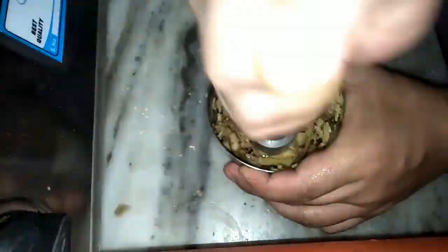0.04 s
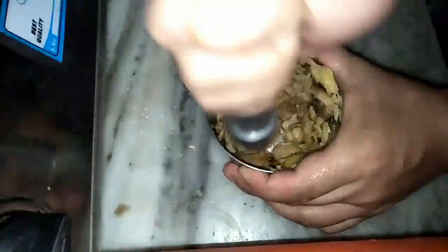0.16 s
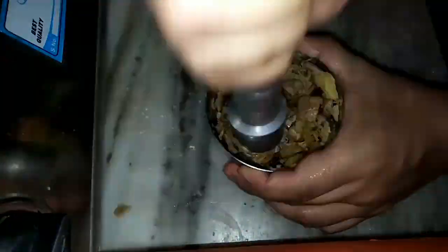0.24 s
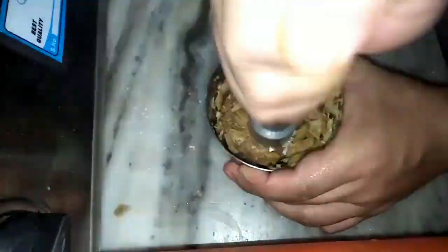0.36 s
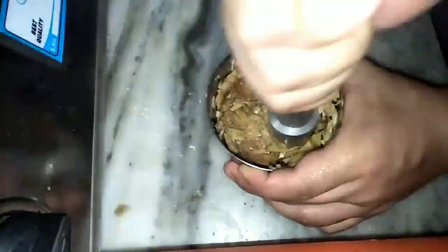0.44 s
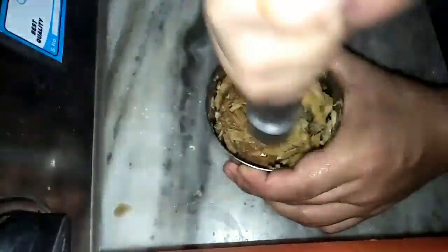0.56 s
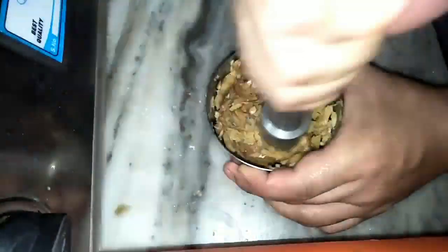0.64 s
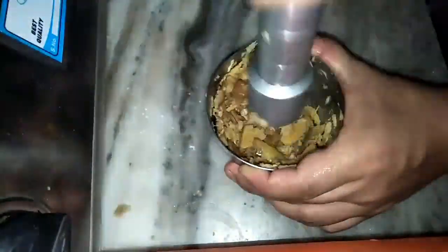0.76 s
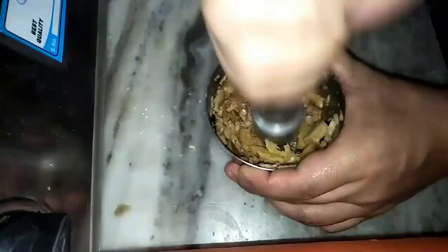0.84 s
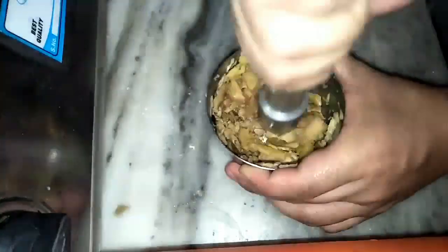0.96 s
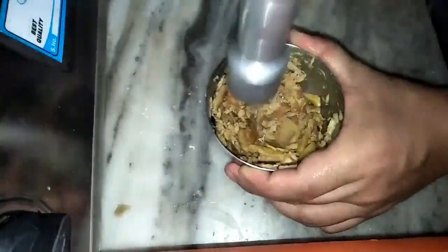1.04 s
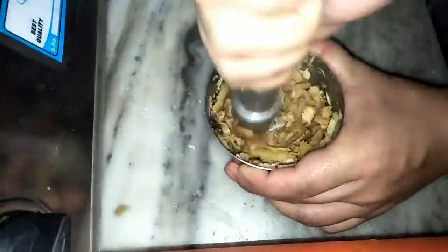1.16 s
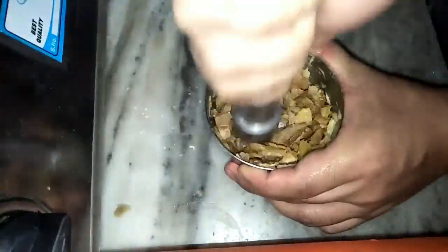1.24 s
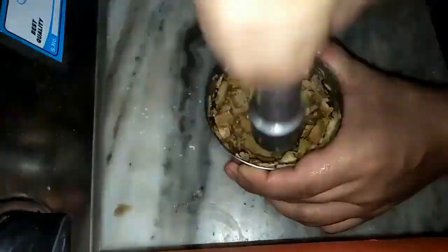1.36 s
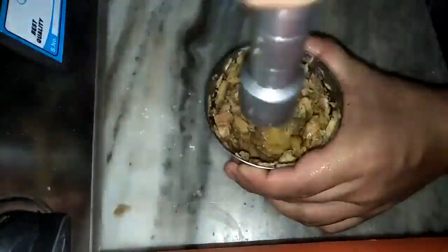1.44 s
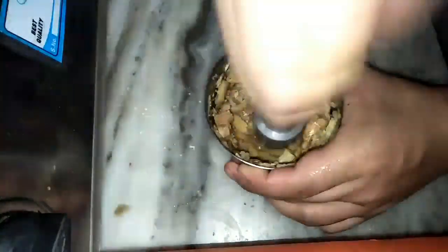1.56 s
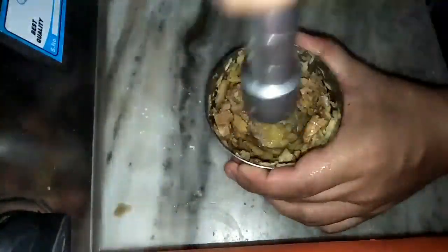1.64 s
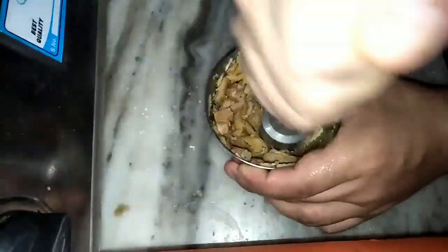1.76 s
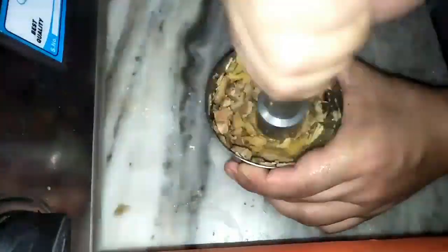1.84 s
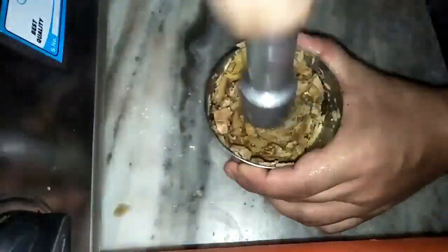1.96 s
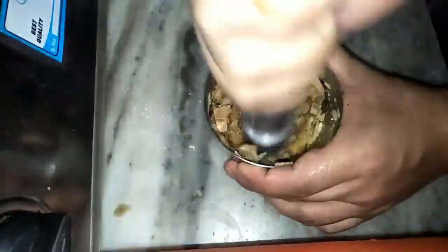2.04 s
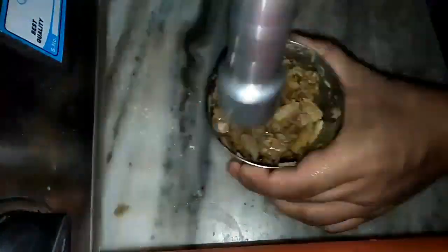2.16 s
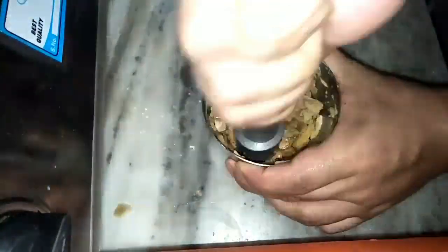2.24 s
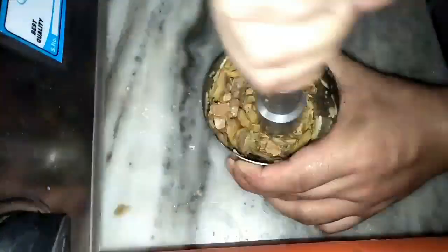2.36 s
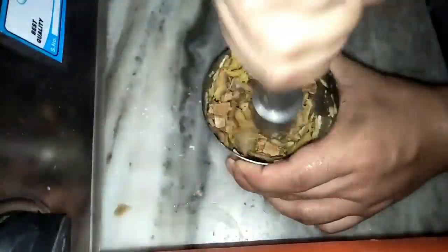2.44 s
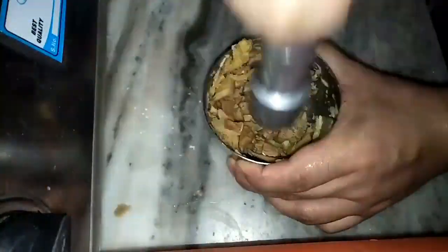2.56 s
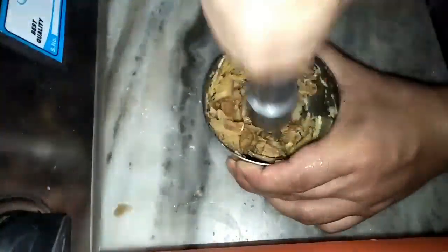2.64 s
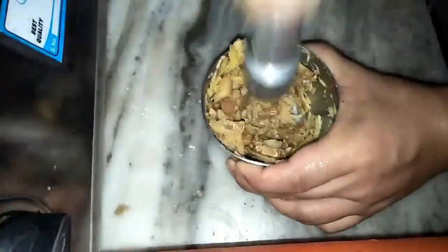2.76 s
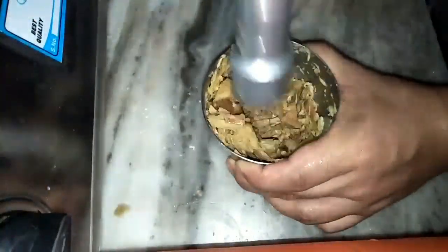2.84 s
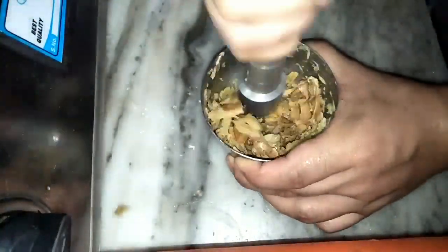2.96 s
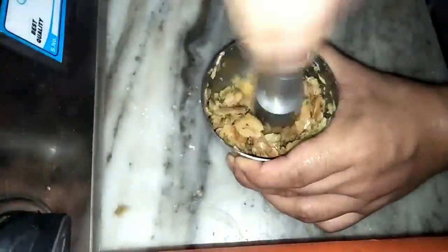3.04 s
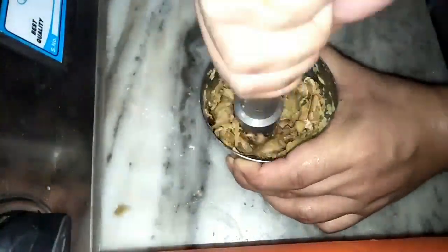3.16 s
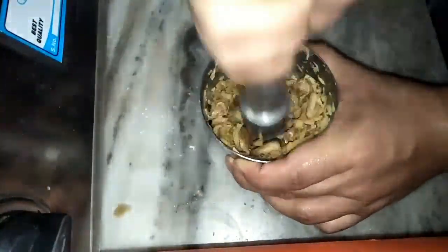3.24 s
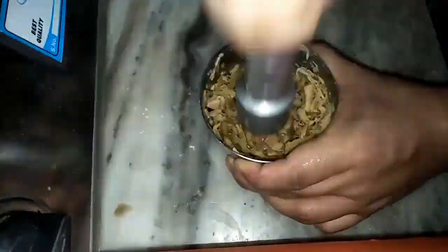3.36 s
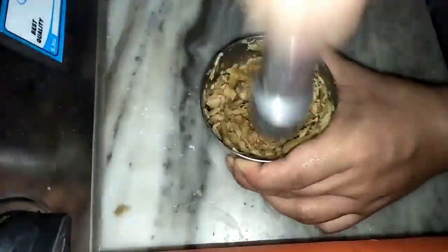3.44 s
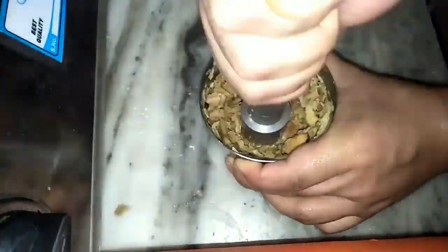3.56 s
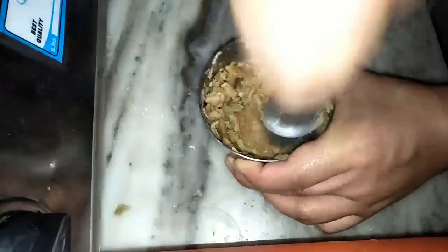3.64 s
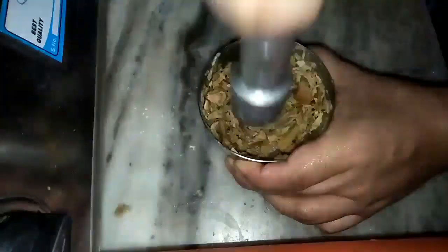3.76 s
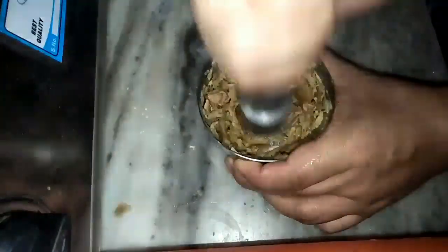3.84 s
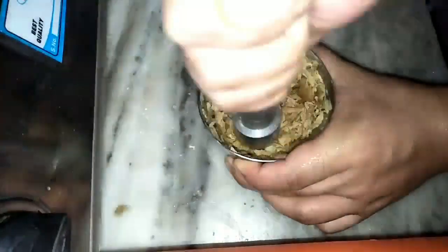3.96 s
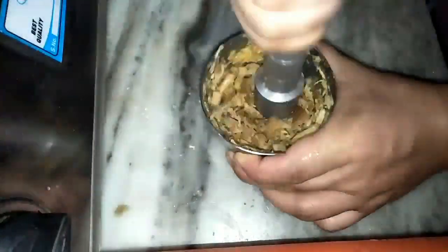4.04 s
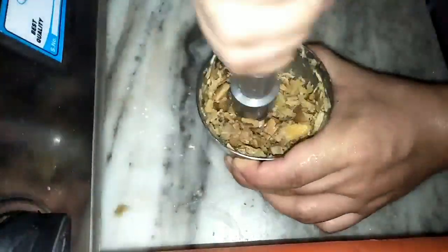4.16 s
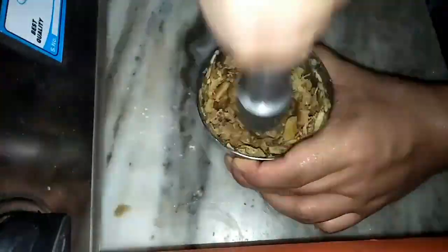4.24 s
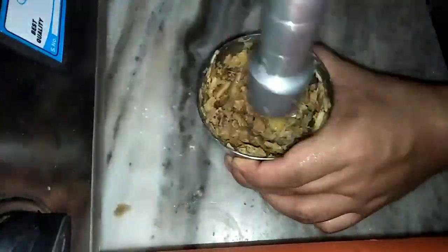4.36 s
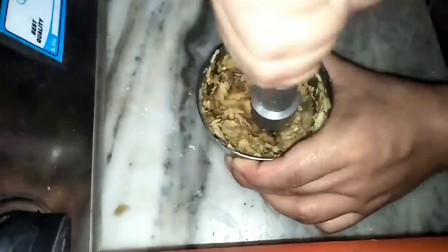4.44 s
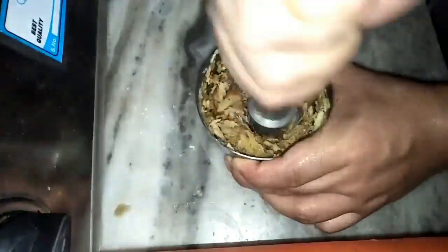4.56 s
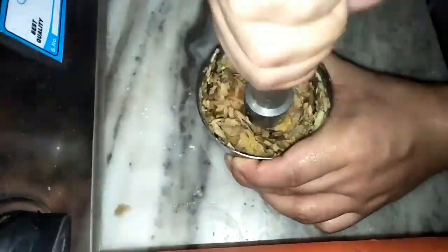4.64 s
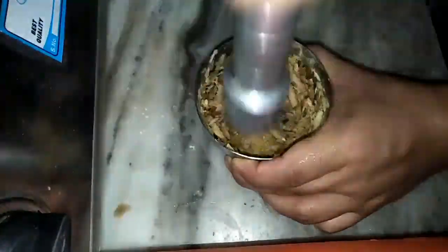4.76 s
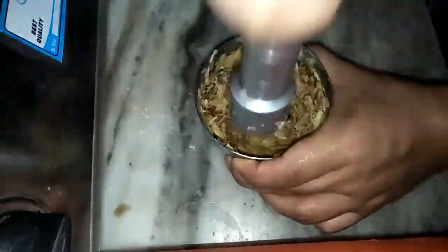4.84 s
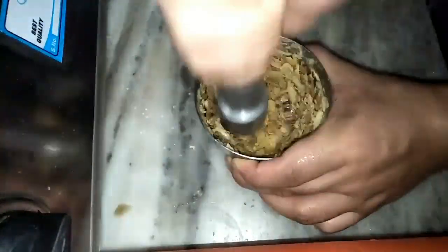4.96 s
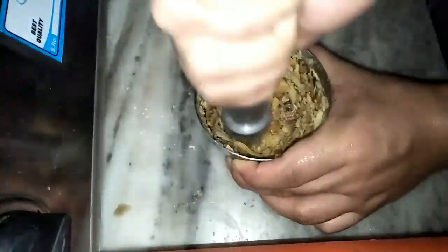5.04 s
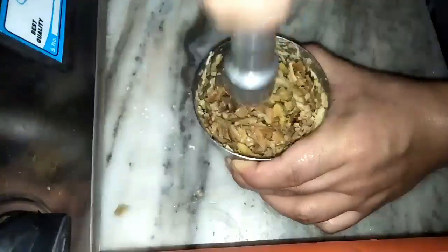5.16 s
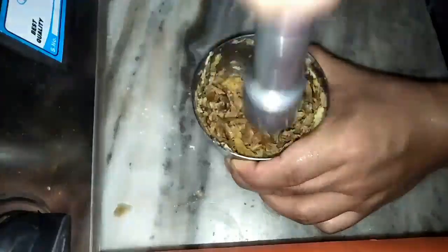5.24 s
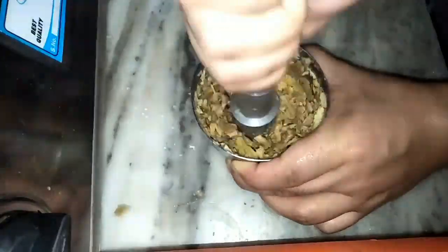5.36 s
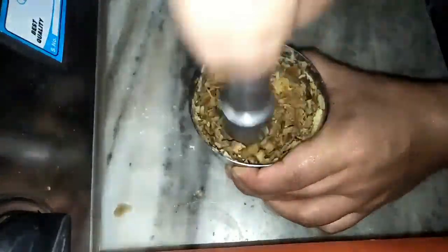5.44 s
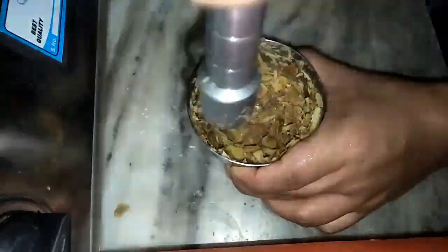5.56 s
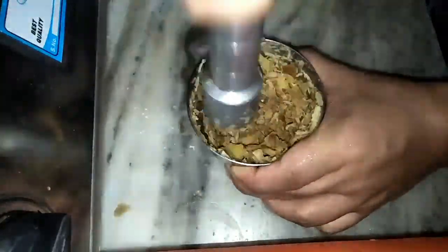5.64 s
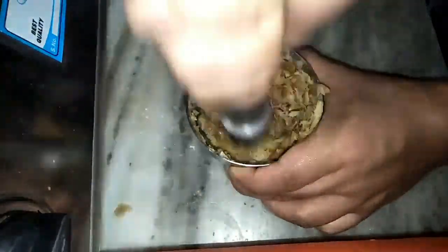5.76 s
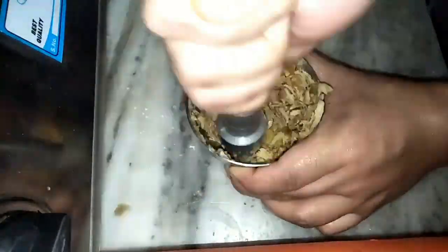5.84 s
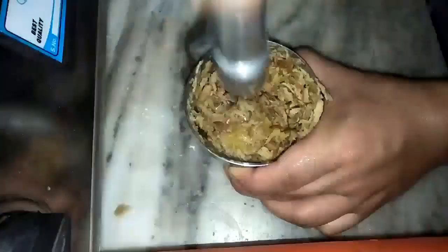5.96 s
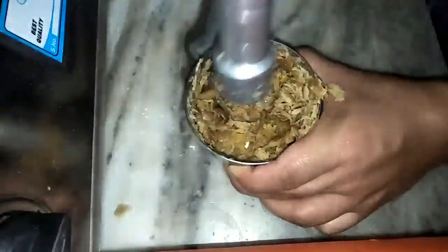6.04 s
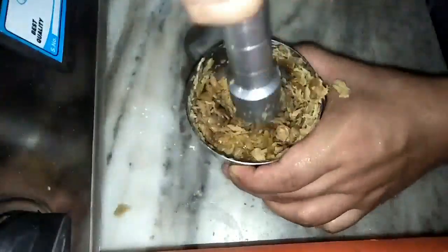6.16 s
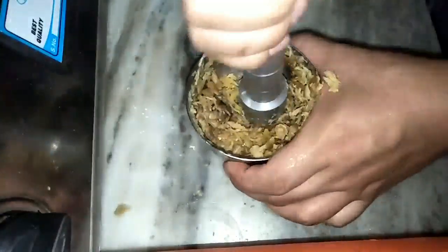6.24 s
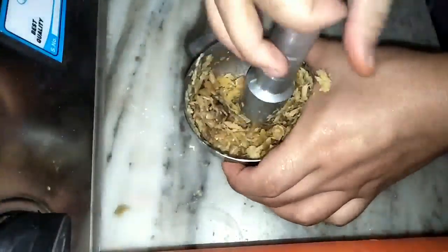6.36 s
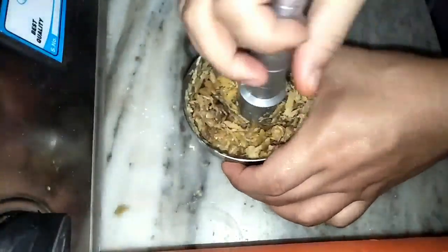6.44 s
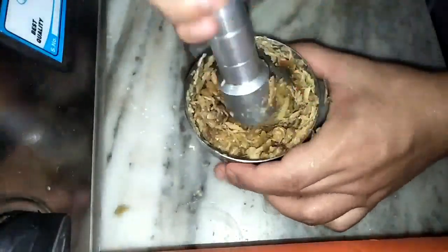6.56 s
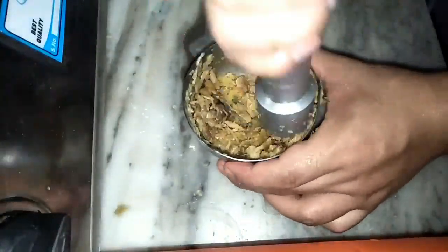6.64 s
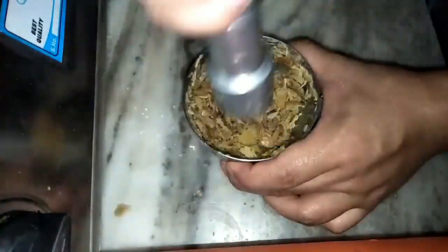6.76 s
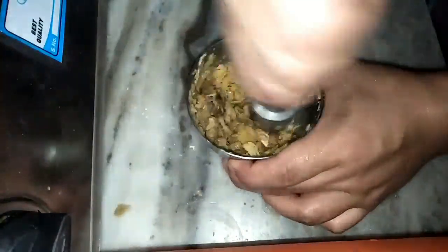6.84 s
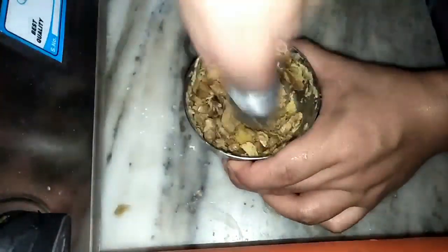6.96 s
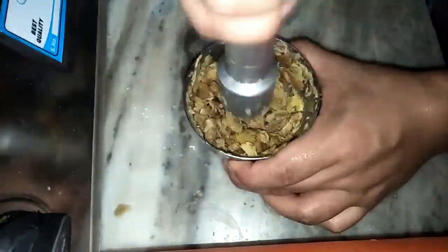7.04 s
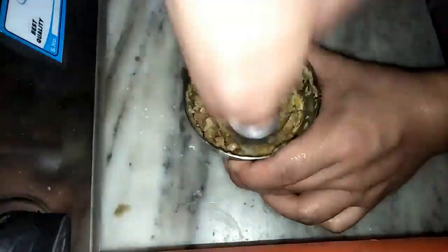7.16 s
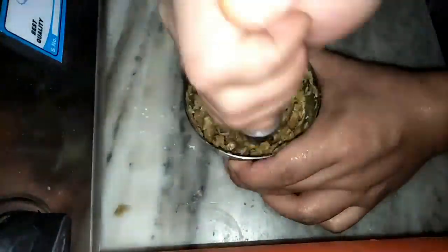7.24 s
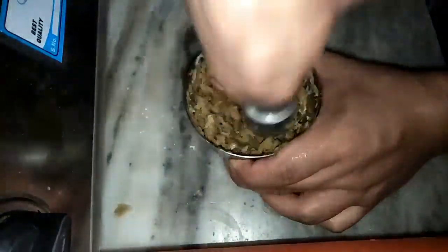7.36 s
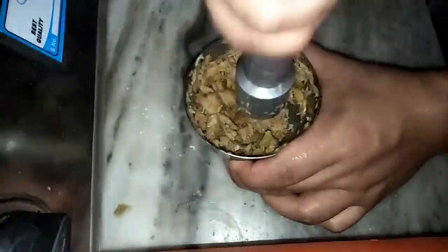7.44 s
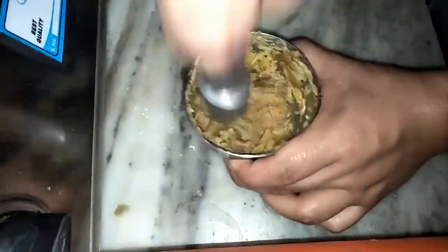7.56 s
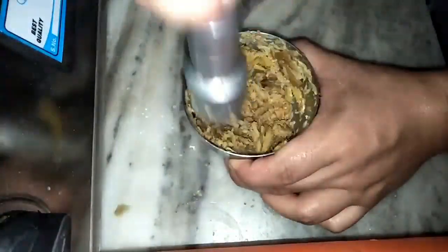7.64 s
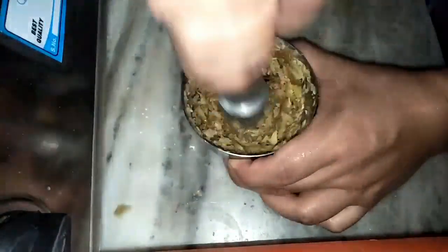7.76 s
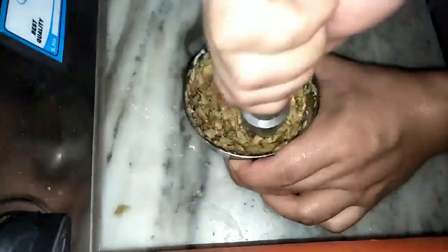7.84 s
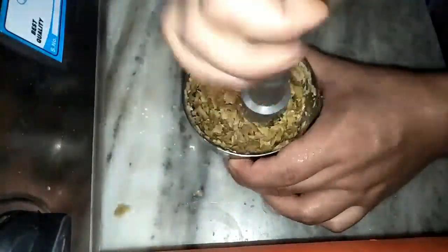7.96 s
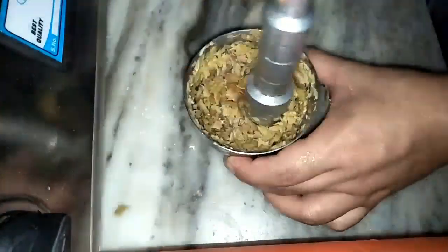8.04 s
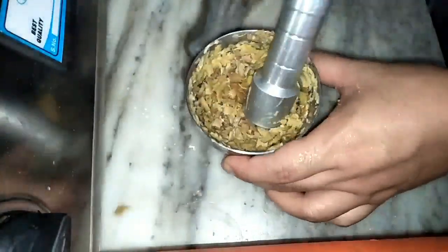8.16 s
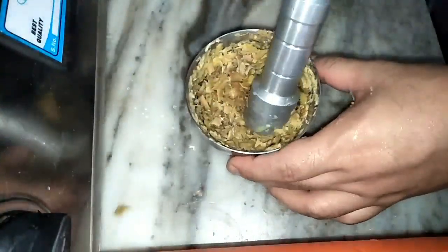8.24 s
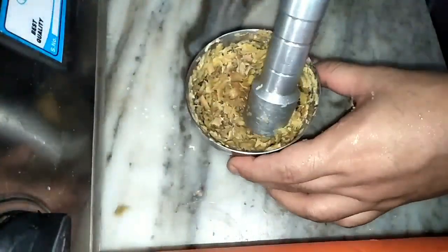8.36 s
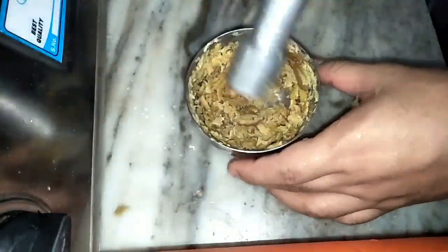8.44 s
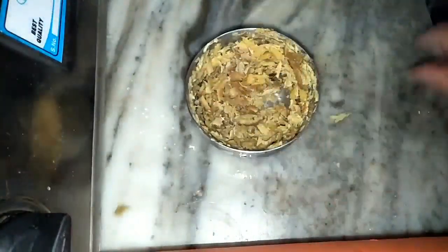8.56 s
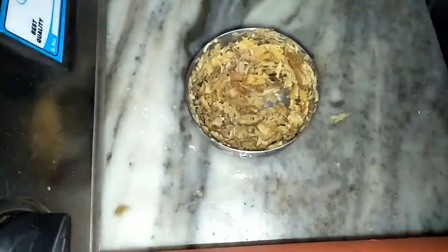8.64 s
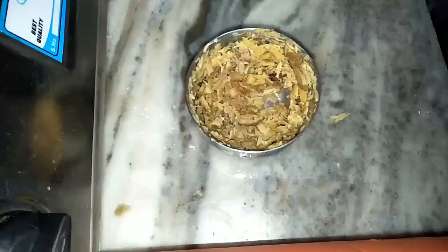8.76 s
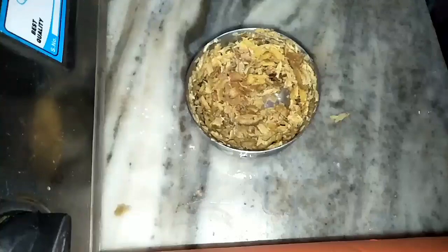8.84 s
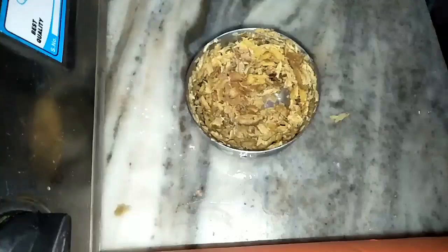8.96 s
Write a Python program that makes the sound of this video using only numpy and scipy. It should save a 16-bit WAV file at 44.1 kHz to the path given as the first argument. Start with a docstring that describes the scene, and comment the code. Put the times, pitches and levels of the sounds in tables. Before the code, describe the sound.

A metal pestle pounds ginger very fast in a small steel mortar on a stone counter. Each blow is a dull thud with a wet crunch, and now and then one hits bare steel with a short, bright clank. The pounding slackens briefly about two thirds through, resumes, then stops near the end. A faint low hum lies underneath, heard close in a small kitchen.

```python
"""Pounding ginger in a steel mortar

A metal pestle pounds ginger very fast in a small steel mortar, held by hand on a stone kitchen counter.
Each blow bursts wet fibres (a crunch) and shoves the mortar against the counter (a dull thud); on bare
steel, contact forces excite the bowl's damped modes (a clank). Walls and ceiling reflect the sound.
A low hum and soft room noise lie underneath; a few faint, far tones sound when the pounding rests."""
import sys
import numpy as np
from scipy import signal
from scipy.fft import rfft, irfft, next_fast_len
from scipy.io import wavfile
from scipy.ndimage import map_coordinates

SR = 44100
rng = np.random.default_rng(int(sys.argv[2]) if len(sys.argv) > 2 else 0)


def store_pcm(level_fs):
    """Save levels as 16-bit WAV."""
    pcm = np.round(np.clip(level_fs, -1, 1) * 32767).astype(np.int16)
    wavfile.write(sys.argv[1], SR, np.atleast_2d(pcm).T)


N = 396895
TIME = np.arange(N) / SR
BLOW_SIZE, LEAD_S = 8192, .04
BLOW_T = np.arange(BLOW_SIZE) / SR - LEAD_S  # seconds from a blow's peak of pressure

# modes of the steel bowl, damped by hand and ginger: (frequency [Hz], relative level [dB])
BOWL_MODES = [(1020, -2.5), (1160, 1.5), (1245, 5), (1490, 4.5), (1780, -3.5), (2025, -7.5), (2430, 1),
              (2640, -3.5), (2790, 0.5), (2935, 2.5), (3120, -12.5), (3500, -5.5), (4050, 7.5),
              (5400, -7.5)]


def from_db(db):
    """Decibels to amplitude ratio."""
    return 10 ** (np.asarray(db) / 20)


def coloured(x, points):
    """Zero-phase filtering by a spectral envelope of (frequency [Hz], gain [dB]) points."""
    hz, db = np.transpose(points)
    size = next_fast_len(len(x))
    bins = np.maximum(np.fft.rfftfreq(size, 1 / SR), 1)
    gain = from_db(np.interp(np.log(bins), np.log(hz), db))
    return irfft(rfft(x, size) * gain, size)[:len(x)]


def at_level(x, db, band, seconds=.04):
    """Parseval's theorem: scale x so that its energy in a band, spread over `seconds`, has this level."""
    hz = np.fft.rfftfreq(len(x), 1 / SR)
    energy = 2 * np.sum(np.abs(rfft(x)[(hz > band[0]) & (hz < band[1])]) ** 2) / len(x)
    return x * from_db(db) / np.sqrt(energy / (seconds * SR) + 1e-20)


def ring(x, hz, t60):
    """Damped harmonic oscillator: its impulse response is a decaying cosine of initial height 1."""
    r, w = from_db(-60 / (t60 * SR)), 2 * np.pi * hz / SR
    return signal.lfilter([1, -r * np.cos(w)], [1, -2 * r * np.cos(w), r * r], x + 1e-18)


def drift(per_s):
    """Smooth random modulation: a spline through Gaussian values of unit spread."""
    return map_coordinates(rng.standard_normal(2000), [TIME * per_s], order=3, mode="wrap")


def grains(per_s, spread_db):
    """Shot noise: a Poisson train of impulses of random size and sign."""
    sizes = from_db(spread_db * np.minimum(rng.exponential(1, BLOW_SIZE), 4))
    signs = rng.choice([-1, 1], BLOW_SIZE)
    return sizes * signs * (rng.random(BLOW_SIZE) < per_s / SR)


def push(when, width):
    """Acceleration pulse under a force that builds slowly and lets go fast."""
    u = np.minimum((BLOW_T - when) / width + 1.4, 5)
    return np.exp(u - np.exp(u)) * (np.exp(u) - (1 - np.exp(u)) ** 2)


def thud(delay_s, thud_db, knock_db, ring_share=0.0094, scatter_db=3, detune=0.031):
    """Impact excitation: the pestle bites into the heap, then bottoms out; both ring the counter."""
    # modes of the mortar on the counter: (frequency [Hz], relative level [dB], T60 [s])
    counter_modes = [(94.2, 3, 0.066), (179.3, -8, 0.11), (300.7, 0.5, 0.07), (371, 4.5, 0.04),
                     (422, -7, 0.043)]
    softness_db = np.clip(thud_db - knock_db - 10, -8, 12)
    width = .0023 * from_db(.25 * softness_db)  # a softer contact lasts longer
    bite = rng.uniform(.15, .5) * push(delay_s - rng.uniform(2.4, 3.8) * width, .8 * width)
    shoves = bite + push(delay_s, width)
    body = shoves.copy()
    for hz, db, t60 in counter_modes:
        gain = ring_share * from_db(db + scatter_db * rng.normal())
        body += gain * ring(shoves, hz * (1 + detune * rng.normal()), t60)
    low = signal.sosfiltfilt(signal.butter(3, 220, fs=SR, output="sos"), body)
    return at_level(low, thud_db, (35, 220)) + at_level(body - low, knock_db, (220, 480))


def contact_pressure(build_s, fade_s):
    """Loading and relaxation: pressure sets in as the pestle lands, swells, then decays exponentially."""
    before = np.maximum(-BLOW_T, 0) / build_s
    rising = np.exp(-0.85 * before ** 2 - (before / 1.15) ** 12)
    return np.where(BLOW_T < 0, rising, np.exp(-np.abs(BLOW_T) / fade_s))


def crunch(pressure, squelch_db, crunch_db, pocket_share=0.022, loose_db=-23, loose_s=0.008):
    """Acoustic emission: fibres burst under pressure and ring small wet pockets, new at every blow."""
    # spectrum of crushed fibres: (frequency [Hz], relative density [dB])
    fibre_spectrum = [(300, -1.5), (700, -14.5), (950, -26.5), (1240, -4.5), (1750, -9), (2300, -1),
                      (2850, 5.5), (3400, 1), (5000, -1), (6500, -12), (8000, -17), (10200, -18),
                      (12000, -51.5)]
    # spectrum of wet pulp squeezed aside: (frequency [Hz], relative density [dB])
    pulp_spectrum = [(250, -14), (480, 2), (680, 7), (800, 3), (950, 1), (1300, -18), (2500, -53)]
    loose_rustle = from_db(loose_db) * np.exp(-(BLOW_T / loose_s) ** 2)
    bursts = grains(per_s=9000, spread_db=3.5) * (pressure + loose_rustle)
    pocket_hz = np.exp(rng.uniform(np.log(1000), np.log(9000), size=8))
    pockets = sum(ring(bursts, hz, t60=.024) for hz in pocket_hz)
    fibres = coloured(bursts + pocket_share * pockets, fibre_spectrum)
    pulp = coloured(bursts, pulp_spectrum)
    return at_level(fibres, crunch_db, (3600, 10000)) + at_level(pulp, squelch_db, (520, 980))


def clank(pressure, clank_db, clank_hz, clink_db, clink_hz, spot_db, focus_db_per_octave):
    """Modal superposition: skid, strike and rattle ring the bowl and two resonances of the struck spot."""
    rattle = from_db(-21) * (BLOW_T > 0) * np.exp(-np.abs(BLOW_T) / 0.0072)
    contacts = grains(per_s=7000, spread_db=3) * (pressure + rattle)
    contacts[round(LEAD_S * SR)] += 0.18  # the strike itself
    low, high = np.zeros((2, BLOW_SIZE))
    for hz, db in [*BOWL_MODES, (clank_hz, spot_db), (clink_hz, spot_db)]:
        detuning = 1 + .008 * rng.normal()
        # modes near the spot's own resonances respond most
        octaves_off = np.abs(np.log2(hz / np.array([clank_hz, clink_hz]))).min()
        gain = from_db(db - focus_db_per_octave * octaves_off + 2 * rng.normal())
        mode = gain * ring(contacts, hz * detuning, t60=.028)
        if hz < 1900:
            low += mode
        else:
            high += mode
    # the small bowl radiates little below its lowest mode, and pulp takes the edge off the contact
    low = signal.sosfilt(signal.butter(3, [980, 1950], "band", fs=SR, output="sos"), low)
    high = signal.sosfilt(signal.butter(3, [1550, 3400], "band", fs=SR, output="sos"), high)
    return at_level(low, clank_db, (1000, 1600)) + at_level(high, clink_db, (2300, 3300))


def favoured_mode(low_hz, high_hz):
    """The strike point selects a mode: draw one in this range, with odds proportional to its power."""
    hz, db = np.transpose([mode for mode in BOWL_MODES if low_hz < mode[0] < high_hz])
    power = np.cumsum(from_db(db) ** 2)
    return hz[np.searchsorted(power, rng.random() * power[-1])]


def ginger_blow(time_s, build_s, thud_db, knock_db, crunch_db, bowl_db):
    """Cushioned impact: the deeper into the ginger, the more squelch and clink. Gives (soft, steel)."""
    force, crisp, depth = knock_db + 30, crunch_db + 44, bowl_db + 46  # dB relative to a full blow
    fade_s = 0.0065 * 2 ** (-max(crisp, -10) / 17.5)  # a crisp crush is over sooner
    pressure = contact_pressure(max(build_s, .0008), fade_s)
    flattening_db = 0.9 * time_s  # flattened ginger squelches less
    squelch_db = -45 + 0.54 * force + 0.68 * depth - flattening_db
    clink_db = -46.5 + 0.56 * crisp + 0.28 * depth  # fibres and pestle both stir the high modes
    bottom_s = 0.0081 - .55 * build_s  # after a slow build-up, less of the stroke is left
    soft = thud(bottom_s, thud_db, knock_db) + crunch(pressure, squelch_db, crunch_db)
    clank_hz, clink_hz = favoured_mode(1100, 1300), favoured_mode(2300, 3000)
    steel = clank(pressure, bowl_db, clank_hz, clink_db, clink_hz, spot_db=0.5, focus_db_per_octave=8.5)
    return soft, steel


def pounding():
    """Superposition of impacts, about twelve a second, most into ginger. Gives (soft, steel)."""
    # blows into ginger: (time [s], build-up [s], thud [dB], knock [dB], crunch [dB], bowl ring [dB])
    on_ginger = [(0.0012, 0.0014, -25.5, -32.5, -58, -58), (0.0678, 0.013, -27.0, -39.5, -50.5, -48.5),
                 (0.1531, 0.0015, -25, -38.5, -43.5, -55.5), (0.243, 0.013, -19.5, -28.5, -50, -43.5),
                 (0.3106, 0.0085, -21.5, -30.5, -43.5, -43.5), (0.395, 0.0094, -21, -28.5, -54, -52.5),
                 (0.4931, 0.0072, -29, -45, -63.5, -55), (0.581, 0.0033, -20, -31, -50.5, -55.5),
                 (0.6674, 0.0052, -19.0, -26.5, -51.5, -38.5), (0.8386, 0.0061, -29, -41.5, -51, -56.5),
                 (0.9225, 0.0041, -19.0, -30, -38, -35.5), (1.006, 0.003, -21, -26, -45, -51),
                 (1.0939, 0.0033, -39.5, -70, -52, -81), (1.1778, 0.0087, -23.5, -38, -47, -56.5),
                 (1.259, 0.0041, -22.5, -35, -44, -52), (1.344, 0.0085, -24, -43.5, -45.5, -59),
                 (1.437, 0.0073, -18.5, -31.5, -46, -50), (1.5154, 0.013, -23.0, -27.5, -50.5, -46),
                 (1.7118, 0.0066, -35, -53.5, -52, -59.0), (1.7951, 0.0091, -26.0, -39.5, -52.5, -49.5),
                 (1.8794, 0.0067, -23, -36.5, -46.5, -48.5), (1.97, 0.016, -25.0, -33, -50, -53.5),
                 (2.0728, 0.0087, -49.5, -62, -70.5, -64), (2.288, 0.0068, -26, -46.5, -41.5, -39),
                 (2.3714, 0.011, -26, -46.5, -42, -49), (2.4563, 0.0096, -21.0, -34.5, -37.5, -37),
                 (2.6273, 0.0012, -20.0, -29, -40, -38.0), (2.7175, 0.0035, -20.0, -27, -44.5, -40.5),
                 (2.929, 0.01, -35, -76, -58.5, -62.0), (3.088, 0.00094, -23.0, -37.5, -44, -50),
                 (3.186, 0.025, -35.5, -47, -61.5, -64), (3.25, 0.013, -20.5, -34.0, -42, -46),
                 (3.347, 0.0054, -33, -60, -49, -43.5), (3.42, 0.0051, -21, -38.0, -40, -46),
                 (3.507, 0.0043, -23.5, -28.5, -40.5, -33.5), (3.5884, 0.0072, -22.5, -28, -48.5, -52.5),
                 (3.758, 0.0037, -21.5, -31.5, -40.5, -46.5), (3.8383, 0.001, -20, -26, -42.5, -35),
                 (3.9302, 0.011, -31.5, -46, -52.5, -66), (3.994, 0.0035, -34.0, -53, -49.5, -51.5),
                 (4.0863, 0.0073, -38, -71, -50, -56.5), (4.162, 0.0075, -26.5, -45.5, -46, -48),
                 (4.251, 0.006, -20.0, -33.5, -42, -43), (4.3328, 0.0013, -27.5, -43, -44, -49),
                 (4.5092, 0.018, -18.5, -27.0, -42.5, -43.0), (4.5819, 0.00062, -20.0, -30, -43.5, -45.0),
                 (4.6764, 0.013, -19, -22.5, -43.5, -40), (4.7624, 0.01, -32, -43.5, -51, -55.5),
                 (4.8262, 0.0031, -18, -32.0, -37.5, -34.5), (4.911, 0.014, -20.5, -28, -48, -48),
                 (4.9839, 0.015, -21.0, -36.5, -51, -58.5), (5.0558, 0.0017, -20, -30.5, -37.5, -46),
                 (5.231, 0.0014, -38, -68, -40.5, -48.5), (5.3111, 0.0061, -26, -39.5, -44, -44.5),
                 (5.3951, 0.0032, -22.0, -28.5, -49, -52), (5.49, 0.016, -36, -46, -53, -57.5),
                 (5.5528, 0.0081, -20.5, -26.0, -40.5, -47.5), (5.6348, 0.013, -32, -49.0, -50.5, -51),
                 (5.7036, 0.011, -28, -44, -55, -45), (5.785, 0.0042, -31.5, -47.0, -43.5, -45.5),
                 (5.8538, 0.005, -21, -30.0, -34, -38.5), (6.1213, 0.012, -30, -52, -45.5, -62),
                 (6.2405, 0.0099, -42.5, -68, -72.5, -69.5), (6.934, 0.0034, -24.5, -33.5, -44, -44.5),
                 (7.0171, 0.0048, -19.5, -25.0, -42, -39.5), (7.106, 0.0016, -21.5, -29.5, -36.5, -44),
                 (7.1948, 0.0053, -33.5, -46, -39.5, -55), (7.2766, 0.0074, -19.5, -25, -44, -46),
                 (7.3633, 0.0082, -22, -29.0, -42.5, -42.5), (7.6214, 0.019, -36, -53.5, -48.5, -50),
                 (7.7032, 0.0042, -36.0, -49.0, -41.5, -53), (7.7829, 0.0037, -24.0, -33.0, -43, -53),
                 (7.8738, 0.0055, -18.0, -21.5, -41.5, -43.5)]
    # blows that slip through to bare steel: (time [s], skid [s], fade [s], thud [dB], crunch [dB],
    # clank level [dB], clank frequency [Hz], clink level [dB], clink frequency [Hz])
    on_steel = [(0.753, 0.0097, .0008, -39, -56, -31.5, 1270, -24.5, 2810),
                (1.6021, .0005, .001, -28, -39, -40.5, 1470, -32, 2900),
                (2.1444, .013, 0.0053, -27.5, -40, -31.5, 1245, -31.5, 2920),
                (2.5411, .0009, 0.003, -37, -38, -20, 1196, -21, 2740),
                (2.8156, 0.0047, 0.0093, -37.5, -45, -32, 1265, -24, 2840),
                (3.004, .002, 0.015, -38.5, -49, -32.5, 1480, -30.5, 2790),
                (3.677, .014, 0.0076, -40, -40.5, -29, 1204, -40, 2370),
                (4.4164, 0.0075, 0.012, -33.5, -42.5, -25.5, 1146, -27, 3000),
                (5.1466, .013, 0.0066, -41.5, -41, -37.5, 1320, -34, 3020),
                (5.9308, .0006, 0.004, -28, -42.5, -24, 1220, -23.5, 2860),
                (6.0264, 0.0023, 0.0069, -63, -47, -45, 1290, -34.5, 2820),
                (6.6999, 0.011, 0.0055, -64.5, -63, -44, 1250, -62.5, 2810),
                (6.8553, 0.0077, 0.0033, -51.5, -45, -19, 1220, -23.5, 2707),
                (7.4385, 0.00076, 0.017, -31, -52.5, -31.5, 1153, -32, 2880),
                (7.524, .0005, .0026, -36, -43, -21.5, 1200, -29, 2730),
                (7.9632, .015, 0.0093, -31, -58, -30, 1130, -38.5, 2750)]
    blows = [(time_s, ginger_blow(time_s, *row)) for time_s, *row in on_ginger]
    blows += [(time_s, steel_blow(*row)) for time_s, *row in on_steel]
    out = np.zeros((2, N + 2 * BLOW_SIZE))
    for time_s, sounds in blows:
        start = round(time_s * SR)
        out[:, start:start + BLOW_SIZE] += sounds
    return out[:, round(LEAD_S * SR):][:, :N]


def hum(hz=95.1, throb_hz=5.9, throb_db=4.5, crest_s=8.14, waver_db=2.0, wander_rad=0.25):
    """Amplitude and phase modulation: a low tone throbs regularly and wavers at random."""
    # slow course of the hum: (time [s], level [dB])
    levels = [(0, -50), (6.2, -53.5), (6.7, -53), (7.2, -47), (8.25, -55), (8.55, -66.5), (8.92, -51)]
    throb = throb_db * np.cos(2 * np.pi * throb_hz * (TIME - crest_s))
    level_db = np.interp(TIME, *np.transpose(levels)) + throb + waver_db * drift(20)
    return np.sqrt(2) * from_db(level_db) * np.sin(2 * np.pi * hz * TIME + wander_rad * drift(25))


def room_air():
    """Filtered Gaussian noise: the soft, nearly steady background of the room."""
    # spectrum of the room noise: (frequency [Hz], relative density [dB])
    spectrum = [(25, -20), (60, -14.5), (85, -11), (110, -8), (135, -17), (180, -27.5), (240, -34.5),
                (700, -40), (2700, -47), (4200, -55), (5600, -56.5), (11000, -64), (16000, -105)]
    # its course in the 300-6000 Hz band: (time [s], level [dB])
    levels = [(0, -72.5), (6.2, -72.5), (6.6, -74), (8.1, -73.5), (8.55, -76), (8.75, -71), (9, -69.5)]
    noise = coloured(rng.standard_normal(next_fast_len(N)), spectrum)
    noise = at_level(noise, 0, (300, 6000), N / SR)[:N]
    return noise * from_db(np.interp(TIME, *np.transpose(levels)))


def echoes(x, table, first_echo_s, build_s):
    """Diffuse reverberation: convolution with noise that decays exponentially, band by band."""
    t = np.arange(SR // 2) / SR
    hz, db, t60 = np.transpose(table)
    onset = np.clip((t - first_echo_s) / build_s, 0, 1)
    edges, response = np.geomspace(35, 14000, 10), 0
    for low, high in zip(edges, edges[1:]):
        band_db, band_t60 = (np.interp(np.log(low * high) / 2, np.log(hz), c) for c in (db, t60))
        tail = rng.standard_normal(len(t)) * onset * from_db(-60 * t / band_t60)
        band = signal.sosfilt(signal.butter(2, [low, high], "band", fs=SR, output="sos"), tail)
        response += from_db(band_db) * band * np.sqrt(2 * (high - low) / SR / np.sum(band ** 2))
    return signal.fftconvolve(x, response)[:N]


def walls(x):
    """Early reflections: the near walls answer almost at once."""
    # reverberation of the walls: (frequency [Hz], gain [dB], T60 [s])
    bands = [(50, -18, 0.75), (155.3, -9.5, 0.048), (347, -14, 0.092), (810, -15.5, 0.1), (2500, -25, 0.11),
             (4940, -17.5, 0.066), (9760, -13.5, 0.037)]
    return echoes(x, bands, first_echo_s=0.0058, build_s=0.0091)


def ceiling(steel):
    """Directivity: the open bowl radiates its clanks upward, and they return later from the ceiling."""
    # reverberation of the ceiling: (frequency [Hz], gain [dB], T60 [s])
    bands = [(300, -19.5, .15), (1200, -33.5, 0.23), (3000, -31, 0.077), (6000, -11, 0.099)]
    return echoes(steel, bands, first_echo_s=0.0094, build_s=0.038)


def rubbing(clumps_db=4):
    """Stick-slip friction: pieces of ginger catch and slide along the pestle between blows."""
    # rubs through loose ginger: (time of middle [s], half length [s], level before clumping [dB])
    rubs = [(0.186, 0.058, -56.5), (0.358, 0.022, -56.5), (0.439, 0.014, -61.5), (0.552, 0.039, -56),
            (1.763, 0.044, -54.5), (1.823, 0.012, -57), (6.74, 0.032, -60), (6.79, 0.013, -87)]
    # spectrum of sliding pieces: (frequency [Hz], relative density [dB])
    spectrum = [(400, -18), (900, -1), (1400, -6.5), (2900, 0), (4200, -5.5), (5500, -8), (7000, -24),
                (11000, -32)]
    out = np.zeros(N)
    t = (np.arange(BLOW_SIZE) - BLOW_SIZE // 2) / SR
    for time_s, half_s, db in rubs:
        slips = coloured(grains(per_s=1500, spread_db=3.5), spectrum)
        slips = at_level(slips, db, (2000, 5500), BLOW_SIZE / SR)
        start = round(time_s * SR) - BLOW_SIZE // 2
        out[start:start + BLOW_SIZE] += slips * np.exp(-(t / half_s) ** 2 / 2)
    return out * from_db(clumps_db * (drift(110) - 1.5))


def steel_blow(skid_s, fade_s, thud_db, crunch_db, clank_db, clank_hz, clink_db, clink_hz):
    """Hard impact: bare steel gives a loud clank and little thud. Gives (soft, steel)."""
    pressure = contact_pressure(max(skid_s, .0008), max(fade_s, .0012))
    squelch_db = np.mean([thud_db, crunch_db, clank_db]) - 5.5
    soft = thud(.011, thud_db, knock_db=thud_db - 9.5) + crunch(pressure, squelch_db, crunch_db)
    steel = clank(pressure, clank_db, clank_hz, clink_db, clink_hz, spot_db=5, focus_db_per_octave=22.5)
    return soft, steel


def far_tones(roughness=0.71):
    """Gaussian tone bursts: faint, gliding tones, roughened by random amplitude modulation."""
    # far tones: (time of middle [s], half length [s], pitch at the middle of the tone [Hz],
    # glide [octaves/s], level [dB])
    tones = [(6.785, 0.022, 873, -6, -61.5), (8.60, .007, 404, -6, -61), (8.785, .016, 475, -2, -56),
             (8.857, 0.032, 650, 0.5, -58), (8.839, 0.012, 1790, 2, -66), (8.92, .011, 1490, 9.5, -69)]
    out, flutter = np.zeros(N), 1 + roughness * drift(120)
    for time_s, half_s, hz, glide, db in tones:
        near = np.abs(TIME - time_s) < 4 * half_s
        t = TIME[near] - time_s
        envelope = np.sqrt(2) * from_db(db) * np.exp(-(t / half_s) ** 2 / 2)
        phase = 2 * np.pi * np.cumsum(hz * 2 ** (glide * t)) / SR
        out[near] += envelope * np.sin(phase)
    return out * flutter


def scene(width_db=-17):
    """Mid-side stereo: the mortar stands straight ahead; decorrelated wall reflections give width."""
    soft, steel = pounding()
    mortar = soft + steel + rubbing()
    overhead = ceiling(steel)
    middle = mortar + walls(mortar) + overhead + hum() + far_tones() + room_air()
    side = from_db(width_db) * coloured(walls(mortar), [(100, -31), (600, -15.5), (3000, -14.5), (9000, 2)])
    return np.array([middle + side, middle - side])


def record(dry, peak_limit=.58, cutoff_hz=11650):
    """Band limiting and soft saturation: deep bass is lost, hard peaks are rounded and the top is cut."""
    thinned = signal.sosfilt(signal.butter(1, 28, "high", fs=SR, output="sos"), dry)
    rounded = thinned / (1 + (thinned / peak_limit) ** 4) ** (1 / 4)
    return signal.sosfilt(signal.ellip(10, .2, 80, cutoff_hz, fs=SR, output="sos"), rounded)


dry = scene()
out = record(dry)
store_pcm(out)
```